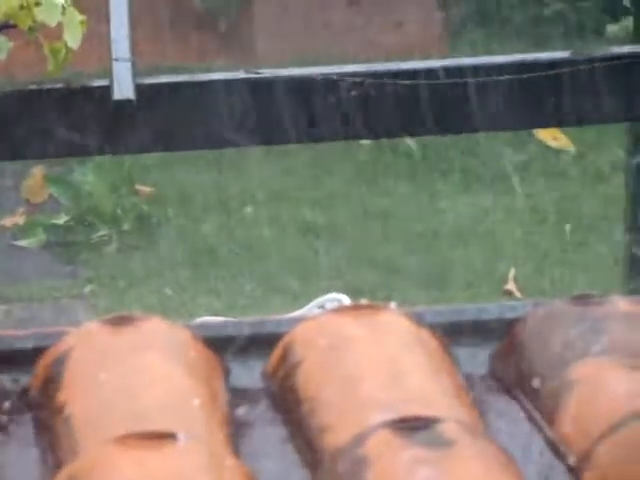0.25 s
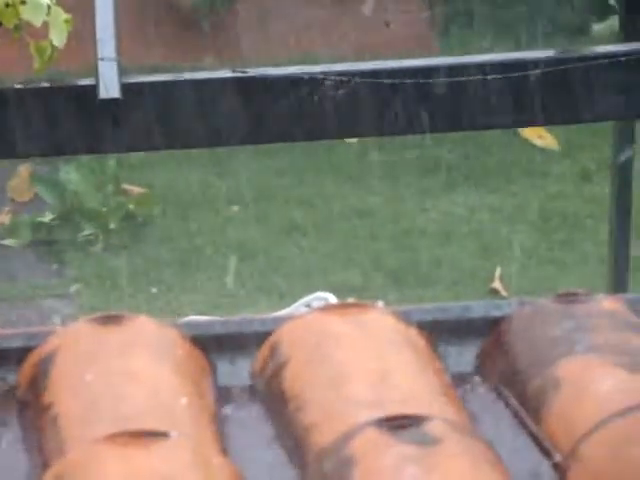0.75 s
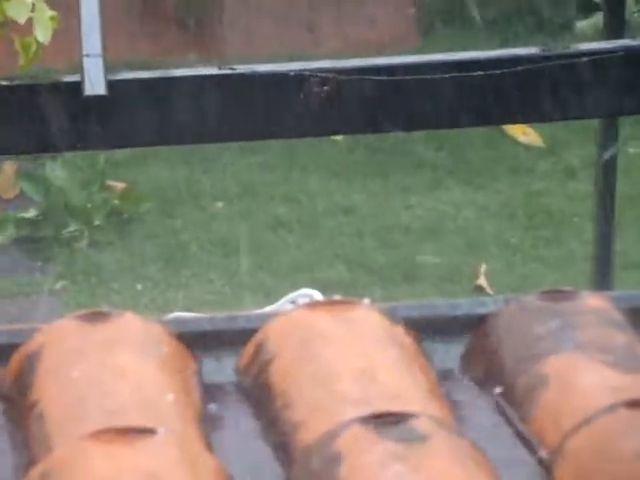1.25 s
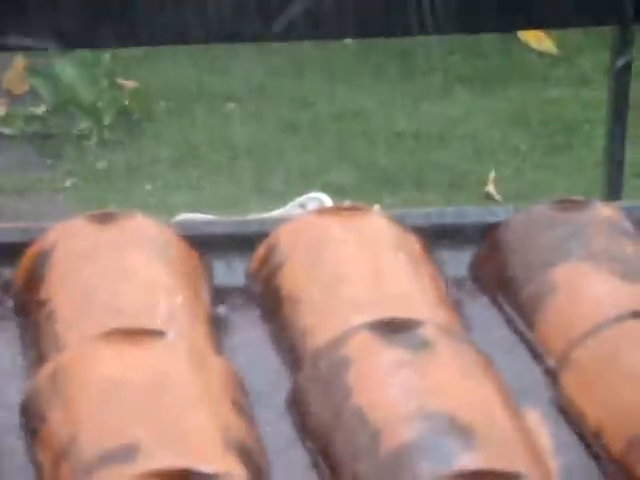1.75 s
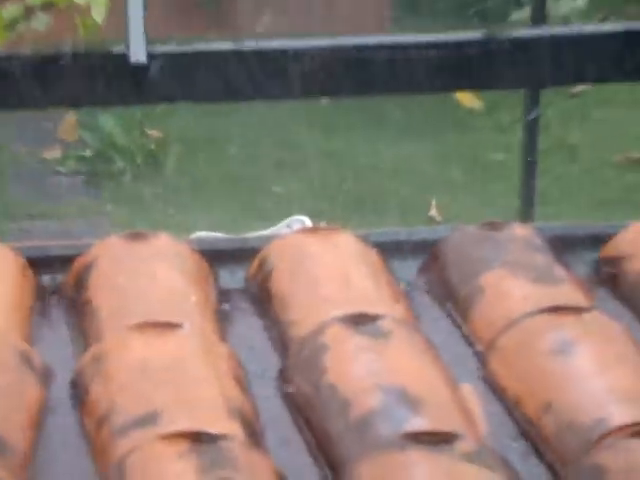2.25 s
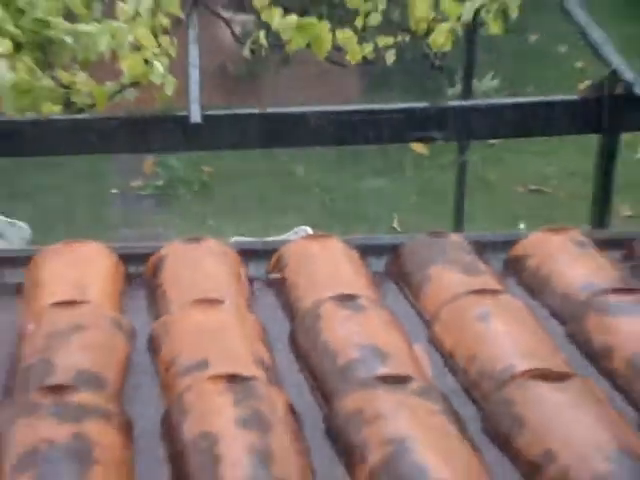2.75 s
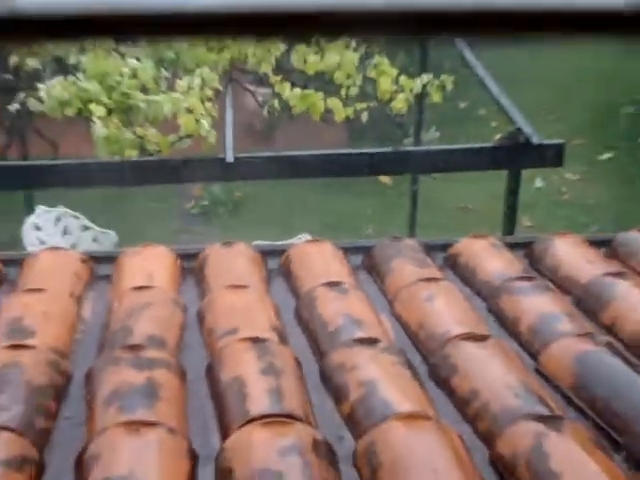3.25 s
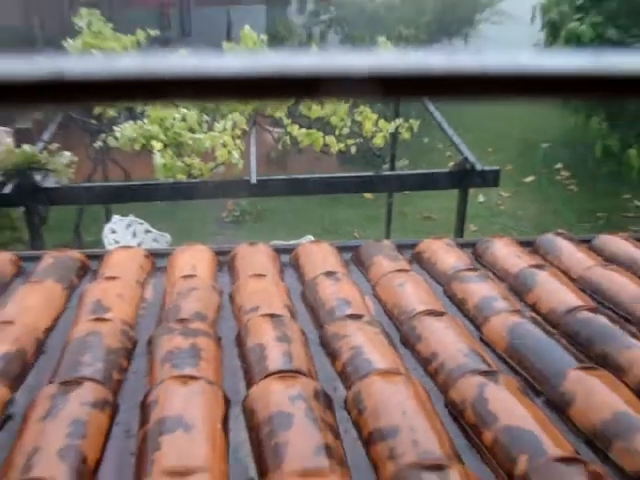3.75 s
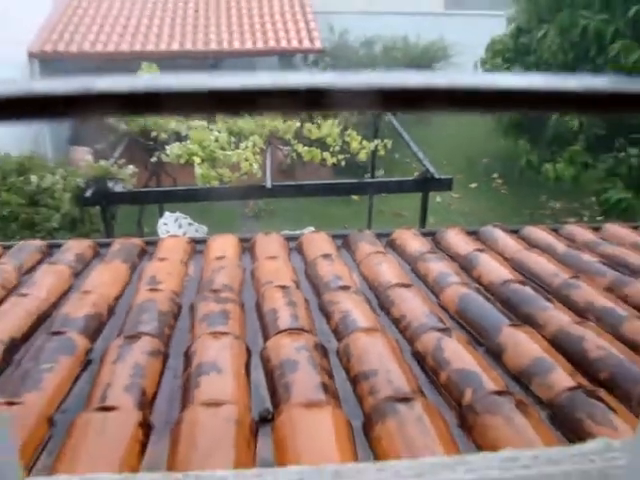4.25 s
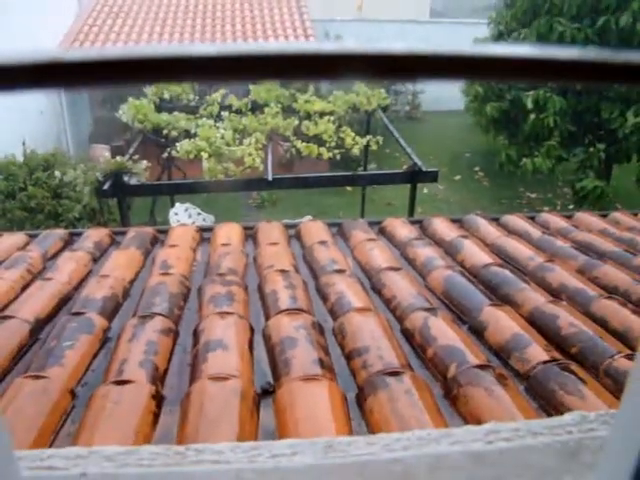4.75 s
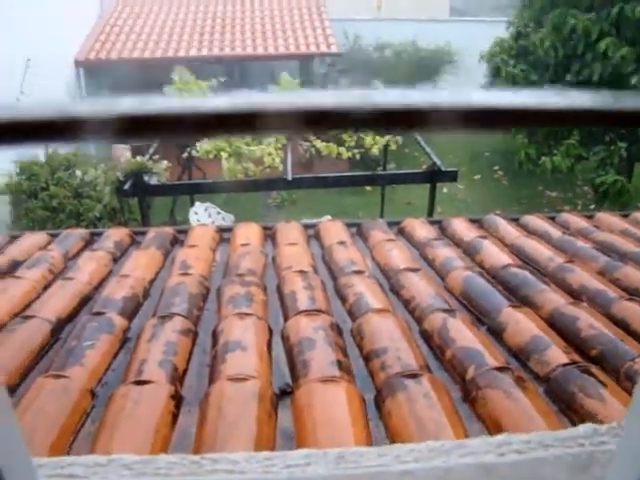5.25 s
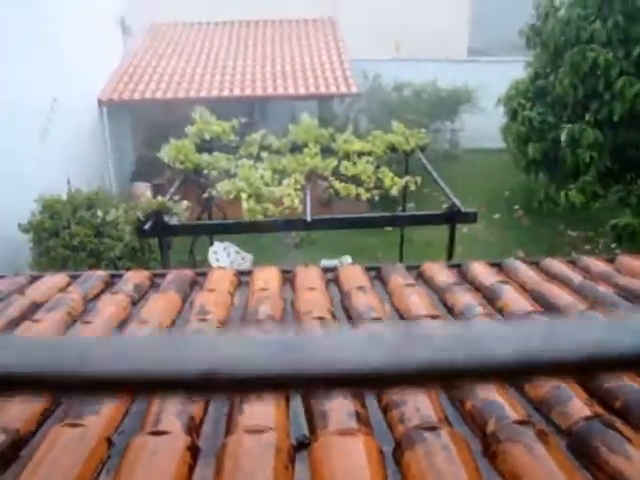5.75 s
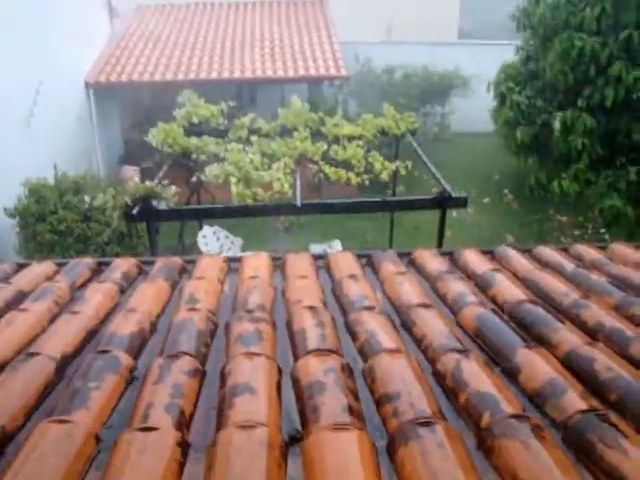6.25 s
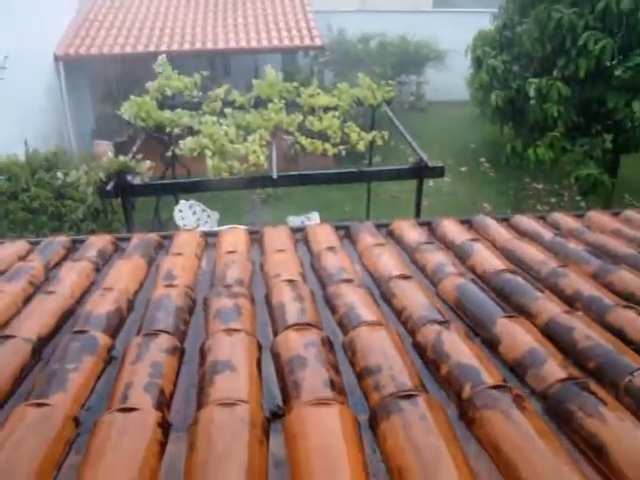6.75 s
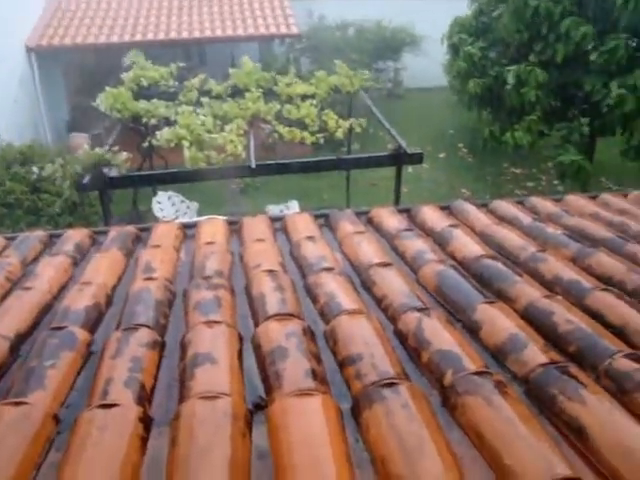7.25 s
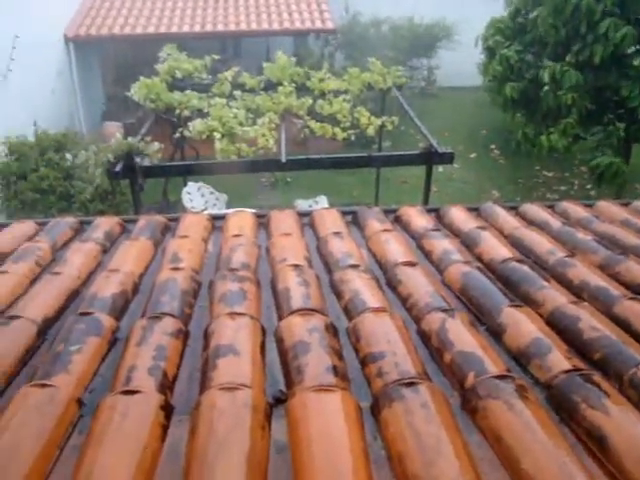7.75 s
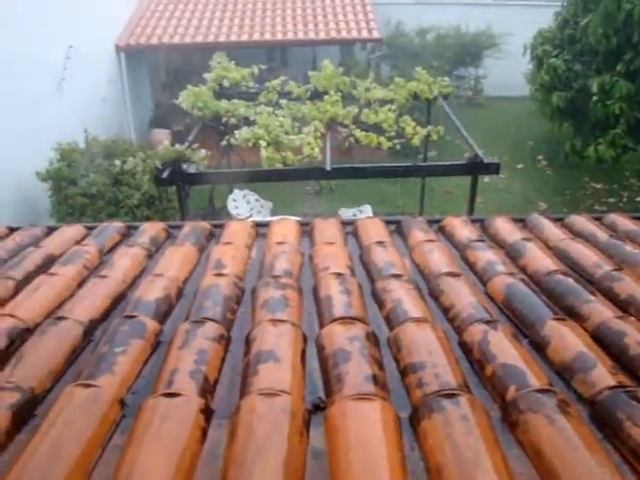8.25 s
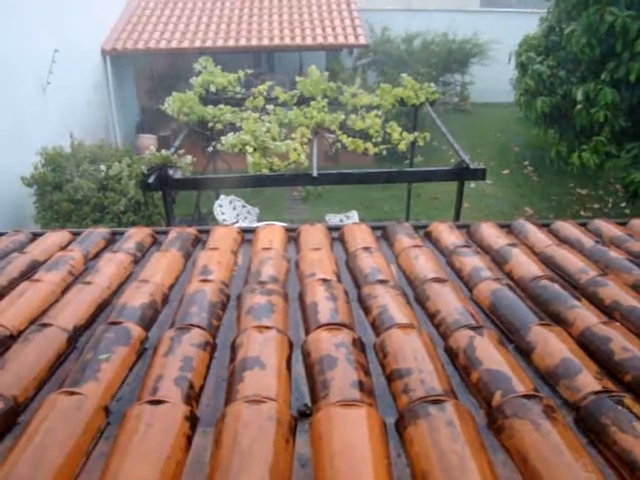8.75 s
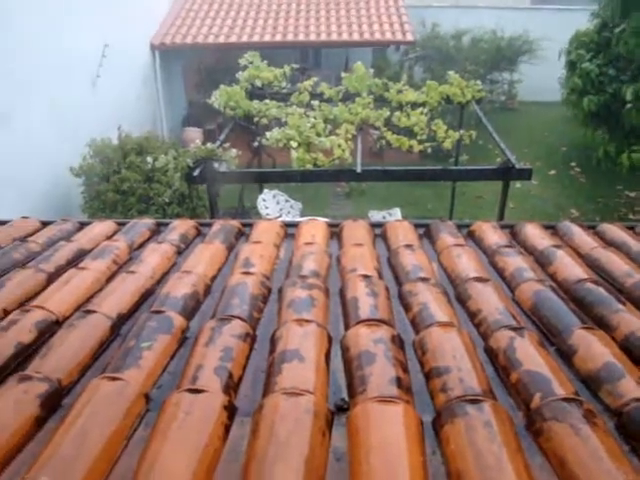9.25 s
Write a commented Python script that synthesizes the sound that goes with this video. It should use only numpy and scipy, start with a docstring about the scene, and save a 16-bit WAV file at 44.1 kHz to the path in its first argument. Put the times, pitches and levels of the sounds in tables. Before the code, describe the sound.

A thick downpour patters and fizzes over wet roof tiles and lawn, dotted with dry ticks and cracking hailstones, swelling towards the end.

```python
"""At a window over a clay-tiled roof and a lawn, in heavy rain and hail; both channels are alike.
Countless short rings make the patter on the tiles, which grows louder and brighter as the shower thickens.
Under it lie a bright hiss of spray, built from tiny rings and noise, and a soft boom of low resonances.
Hailstones clack as damped tones with a crack, and near drops burst into puffs of coloured noise.
Sharp close ticks are single spikes; just after the louder ones the level of the rain dips briefly."""
import sys
import numpy as np
from scipy import signal
from scipy.fft import rfft, irfft
from scipy.io import wavfile

SR = 44100
rng = np.random.default_rng(int(sys.argv[2]) if len(sys.argv) > 2 else 0)


def transcribe(u):
    """Save the signal u as a 16-bit wav file named by the first command-line argument.

    u: samples, shape (n,) or (channels, n), limited to [-1, 1]; the rate is SR.
    q: integer samples, one column per channel.
    """
    v = np.clip(np.atleast_2d(u).T, -1, 1)
    q = np.round(v * 32767).astype(np.int16)
    wavfile.write(sys.argv[1], SR, q)


N = 419391  # length of the scene in samples
TIME = np.arange(N) / SR  # seconds
USUAL_PATTER_DB = -30  # strength at which the patter has its plain colour


def gain_of(db):
    """Turns decibels into a factor."""
    return 10 ** (np.asarray(db) / 20)


def evened(x):
    """Scales a sound to an average (rms) level of 1."""
    return x / np.sqrt(np.mean(x ** 2) + 1e-20)


def add(mix, s, sound):
    """Mixes a sound in at time s, in seconds."""
    start = max(round(s * SR), 0)
    part = mix[start:][:len(sound)]
    part += sound[:len(part)]


def filtered(x, order, hz):
    """Takes out what lies below hz."""
    return signal.sosfilt(signal.butter(order, hz, "high", fs=SR, output="sos"), x)


def coloured(x, points, band):
    """Shapes the spectrum of x, then scales it so that the part inside the band has rms 1."""
    hz = np.fft.rfftfreq(N, 1 / SR)
    point_hz, point_db = np.transpose(points)
    curve_db = np.interp(np.log(hz + 1), np.log(point_hz), point_db)
    spectrum = rfft(x) * gain_of(curve_db)
    in_band = irfft(spectrum * (hz > band[0]) * (hz < band[1]), N)
    return irfft(spectrum, N) / np.std(in_band)


def flutter(slow_hz, fast_hz):
    """Random wavering of rms 1, mostly between two rates."""
    hz = np.fft.rfftfreq(N, 1 / SR)
    shape = hz / (hz ** 2 + slow_hz ** 2) ** .75 / (1 + (hz / fast_hz) ** 2)
    return evened(irfft(rfft(rng.standard_normal(N)) * shape, N))


def impacts(per_s, spread_db):
    """Clicks at random moments: a positive spread makes a few stand out, a negative one makes a few weak."""
    size = gain_of(spread_db * np.minimum(rng.exponential(1, N), 4))
    happens = rng.random(N) < per_s / SR
    return size * rng.choice([-1, 1], N) * happens


def drops(per_s, spread_db, low_hz, high_hz, cycles, clump_db, count=24):
    """Each impact rings for a few cycles at the pitch of the spot that it hits; impacts come in clumps."""
    t = np.arange(512) / SR
    out = np.zeros(N)
    for hz in np.geomspace(low_hz, high_hz, count):
        ring = np.sin(2 * np.pi * hz * t) * np.exp(-hz * t / cycles)
        # a new random clump strength every 0.02 s
        knots = np.arange(rng.uniform(-.02, 0), TIME[-1] + .02, .02)
        clump = np.interp(TIME, knots, rng.standard_normal(len(knots)))
        hits = impacts(per_s / count, spread_db) * gain_of(clump_db * clump)
        out += np.sqrt(hz) * evened(signal.oaconvolve(hits, ring)[:N])
    return evened(out)


# Strength of the shower, before each layer's own trim:
# (time [s], level of the patter [dB], level of the spray [dB])
SHOWER_STRENGTH = [(0.0, -33, -29), (0.61, -32, -27.5), (1.78, -33.5, -30.5), (1.88, -36, -33.0),
                   (2.18, -32.5, -29.5), (2.87, -33.5, -31), (3.35, -29, -31), (3.95, -27.9, -30.5),
                   (4.06, -29.5, -32), (4.89, -29.5, -33), (5.74, -30.5, -30.5), (7.36, -27, -30.5),
                   (7.85, -26.5, -30), (8.32, -29, -33), (8.53, -26, -31.5), (9.07, -25, -30.5),
                   (9.18, -23, -27.5), (9.51, -26.5, -31)]


def shower(s):
    """The strength of the rain at time s: levels of the patter and of the spray, in dB."""
    at, patter_db, spray_db = np.transpose(SHOWER_STRENGTH)
    return np.interp(s, at, patter_db), np.interp(s, at, spray_db)


# Hollow resonances of the roof:
# (pitch [Hz], half width [Hz], rms level at the usual patter [dB], gain per dB of patter [dB])
ROOF_RESONANCES = [(116, 41, -71, 0.7), (190, 16, -68.5, 1.1), (245, 26.5, -58.5, 0.9),
                   (348, 56, -55.5, 1.13), (528, 96, -53.5, 2.5)]


def drumming():
    """The merged impacts boom softly in a few low resonances, which swell with the patter."""
    hz = np.fft.rfftfreq(N, 1 / SR)
    out = np.zeros(N)
    swell_db = shower(TIME)[0] - USUAL_PATTER_DB
    for pitch, width, db, share in ROOF_RESONANCES:
        resonance = hz / (1 + ((hz - pitch) / width) ** 2)
        boom = irfft(rfft(rng.standard_normal(N)) * resonance, N)
        out += evened(boom) * gain_of(db + share * swell_db)
    return out


# Colour of the spray: (frequency [Hz], relative level [dB])
SPRAY_COLOUR = [(100, -38), (500, -20.5), (900, -8.5), (1600, -1.5), (3000, -3), (4800, -1), (7500, -1.5),
                (10000, -2.5)]


def spray(level_db=0.17, far_db=-1, flutter_db=1.15):
    """Tiny droplets thrown off the tiles fizz in uneven flurries over the hiss of the lawn."""
    near = drops(per_s=7000, spread_db=-1.0, low_hz=2256, high_hz=9660, cycles=8.7, clump_db=0.9)
    far = gain_of(far_db) * rng.standard_normal(N)
    sound = coloured(near + far, SPRAY_COLOUR, band=(5000, 10000))
    waver_db = flutter_db * flutter(slow_hz=1.5, fast_hz=50)
    return sound * gain_of(level_db + shower(TIME)[1] + waver_db)


# Colour of the patter: (frequency [Hz], relative level [dB])
PATTER_COLOUR = [(30, -40), (90, -32), (160, -26), (240, -18.5), (420, -9), (560, -6.5), (720, -3),
                 (950, -2), (1500, 0.5), (2500, -1), (4000, -5), (6500, -12), (10000, -36)]


def patter(level_db=-0.32, far_gain=2, flutter_db=0.48, bright_hz=2200, brighten=0.16):
    """Dull taps on wet tiles over the merged wash of farther roofs; the harder they fall, the brighter."""
    near = drops(per_s=3600, spread_db=2.2, low_hz=496, high_hz=5150, cycles=3.4, clump_db=2.2)
    far = far_gain * rng.standard_normal(N)
    sound = coloured(near + far, PATTER_COLOUR, band=(400, 2500))
    strength_db = shower(TIME)[0]
    highpass = signal.butter(2, bright_hz, "high", fs=SR, output="sos")
    treble = signal.sosfiltfilt(highpass, sound)
    # brighten: dB of treble per dB of patter
    treble_gain = gain_of(brighten * (strength_db - USUAL_PATTER_DB))
    sound = sound + treble * (treble_gain - 1)
    waver_db = flutter_db * flutter(slow_hz=2.1, fast_hz=35)
    return sound * gain_of(level_db + strength_db + waver_db)


def fizz(length, hz, spread=0.24, skirt=0.39, skirt_spread=1.0):
    """A quick swell of droplets that dies away: most near one pitch, the rest scattered widely around it."""
    u = np.arange(8192) / SR / (length / 4)  # the swell is highest at u = 1
    octaves = np.log2((np.fft.rfftfreq(len(u), 1 / SR) + 1) / hz)
    core = np.exp(-(octaves / spread) ** 2)
    colour = core + skirt * np.exp(-(octaves / skirt_spread) ** 2)
    noise = irfft(rfft(rng.standard_normal(len(u))) * colour)
    return evened(noise) * u * np.exp(1 - u)


# The largest drops bursting, from dull slaps to fine spray, before the common trim:
# (time [s], level [dB], length [s], pitch [Hz])
LARGE_SPLASHES = [(1.108, -18, .012, 4930), (2.211, -23.5, 0.028, 1630), (2.323, -23, .03, 4500),
                  (3.134, -20, .018, 8450), (3.735, -18.5, 0.033, 4800), (3.929, -22, 0.056, 5030),
                  (4.315, -24, 0.023, 5700), (5.235, -24, .03, 8000), (5.749, -18, .014, 3600),
                  (5.905, -19, .014, 4280), (6.019, -18.5, 0.016, 9200), (6.584, -17, .013, 5200),
                  (8.109, -20.5, .04, 7500), (8.438, -17, .014, 3620), (9.149, -24, .05, 2510),
                  (9.224, -20, .035, 5000)]


def splashes(level_db=-5.0, small_db=-10, range_db=8, count=150):
    """Large drops shatter on the tiles, with many smaller splashes between them."""
    out = np.zeros(N)
    for s, db, length, hz in LARGE_SPLASHES:
        add(out, s, gain_of(db + level_db) * fizz(length, hz))
    # small splashes at random, louder where the spray is stronger
    for when, size, long, pitch in rng.random((count, 4)):
        s = when * TIME[-1]
        db = shower(s)[1] + small_db + range_db * size
        add(out, s, gain_of(db) * fizz(0.012 + 0.034 * long, 3000 + 7000 * pitch))
    return out


# Sharp dry ticks close by, before the common trims:
# (time [s], peak level [dB], depth of the dip that follows [dB])
CLOSE_TICKS = [(0.323, -14, 4.3), (0.76, -11, 2.6), (0.856, -18, 3.5), (0.956, -17, 4.8), (1.128, -22, 4),
               (1.291, -17, 4.7), (1.786, -19, 2.3), (1.861, -11, 1.5), (2.241, -14, 3.3),
               (2.662, -16, 2.6), (2.779, -18, 3), (4.01, -8, 4.1), (4.335, -18, 5), (4.666, -8, 1.2),
               (4.858, -19, 4.5), (5.024, -14, 3.9), (5.265, -9, 1), (5.639, -13, 4.3), (5.851, -15, 3.5),
               (6.24, -9, 1.9), (6.995, -16, 2.5), (7.884, -13, 5), (8.17, -14, 3.7)]


def ticks(level_db=9.5, rebound=0.34, rebound_s=.0003, lowest_hz=35, faint_db=-25, range_db=6, count=22):
    """Single pressure spikes with a slight rebound and no ring, so they reach far into the bass."""
    t = np.arange(128) / SR
    out = np.zeros(N)
    swing = np.exp(-t / rebound_s)
    spike = rebound * swing / swing.sum() - (t == 0)
    for s, db, _ in CLOSE_TICKS:
        add(out, s, gain_of(db + level_db) * spike)
    # faint ticks at random
    for when, size in rng.random((count, 2)):
        db = faint_db + range_db * size
        add(out, when * TIME[-1], gain_of(db + level_db) * spike)
    return filtered(out, 1, lowest_hz)


def dips(quick=1.0, quick_s=0.0066, slow=0.34, slow_s=0.11):
    """The level falls at once at each listed tick; most comes straight back, the rest more slowly."""
    t = np.arange(SR // 2) / SR
    dip_db = np.zeros(N)
    recovery = quick * np.exp(-t / quick_s) + slow * np.exp(-t / slow_s)
    for s, _, depth_db in CLOSE_TICKS:
        add(dip_db, s, depth_db * recovery)
    return gain_of(-dip_db)


# The loudest hailstones on near tiles, before the bass is taken out:
# (time [s], peak level [dB], pitch of the clack [Hz])
LOUD_STONES = [(1.1112, -17, 4930), (4.3066, -7, 1670), (5.7535, -12, 2720), (5.986, -11, 4210),
               (6.449, -8, 4440), (6.594, -4.5, 3000), (8.786, -10, 2730)]


def stones(cycles=0.91, crack_db=-7, crack_s=0.00074, small_db=-19, range_db=5, count=14):
    """Ice on clay: a heavily damped clack and a short crack, too small to radiate bass."""
    t = np.arange(1024) / SR
    out = np.zeros(N)
    # smaller stones fall at random
    small = [(when * TIME[-1], small_db + range_db * size, 2000 + 2500 * pitch)
             for when, size, pitch in rng.random((count, 3))]
    for s, db, hz in list(LOUD_STONES) + small:
        clack = np.sin(2 * np.pi * hz * t) * np.exp(-hz * t / cycles)
        crack = gain_of(crack_db) * rng.standard_normal(len(t)) * np.exp(-t / crack_s)
        hit = clack + crack
        add(out, s, gain_of(db) * hit / np.max(abs(hit)))
    return filtered(out, 2, 1000)


def scene(waver_db=0.27):
    """Rain and hail waver together a little and dip at the ticks; the ticks themselves stay steady."""
    rain = drumming() + spray() + patter() + splashes() + stones()
    rain = rain * gain_of(waver_db * flutter(slow_hz=3.4, fast_hz=25))
    mono = rain * dips() + ticks()
    return np.array([mono, mono])


def record(dry, edge_hz=10150):
    """A steep low-pass filter removes the highest treble."""
    lowpass = signal.firwin(1023, edge_hz, window=("kaiser", 9), fs=SR)
    return signal.oaconvolve(dry, lowpass[None], "same", axes=1)


dry = scene()
out = record(dry)
transcribe(out)
```